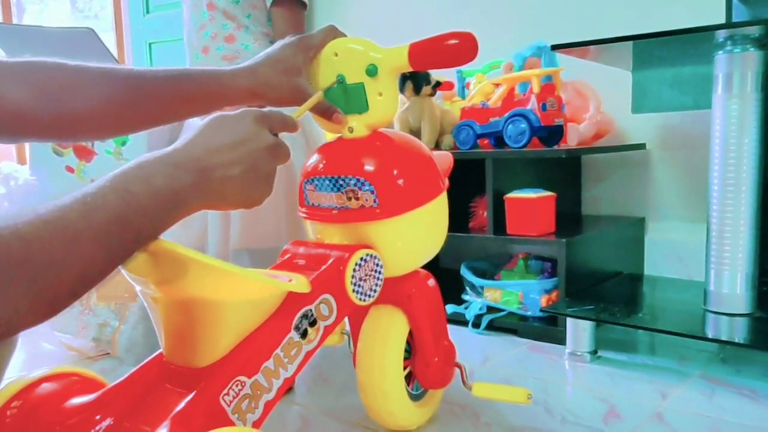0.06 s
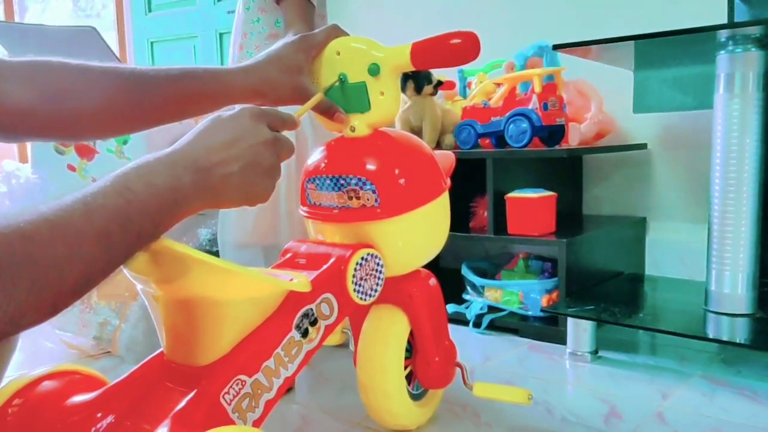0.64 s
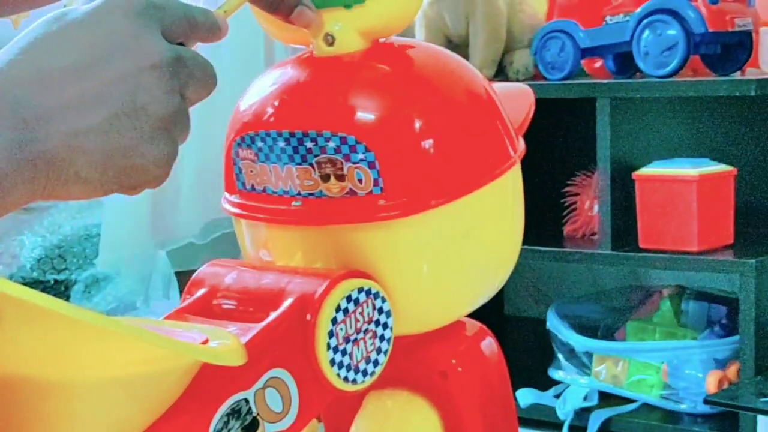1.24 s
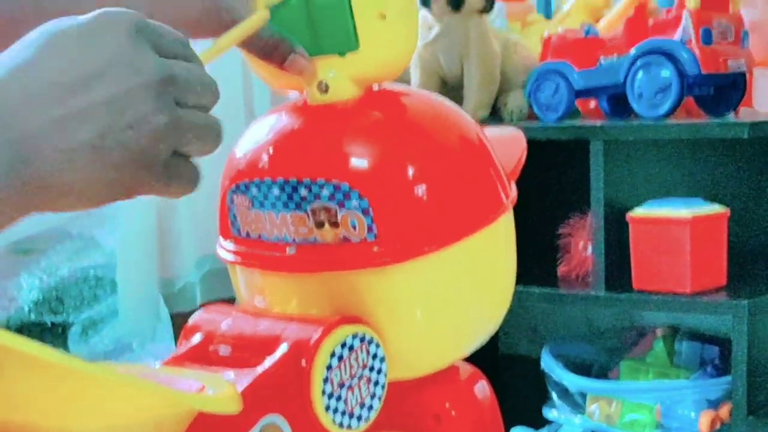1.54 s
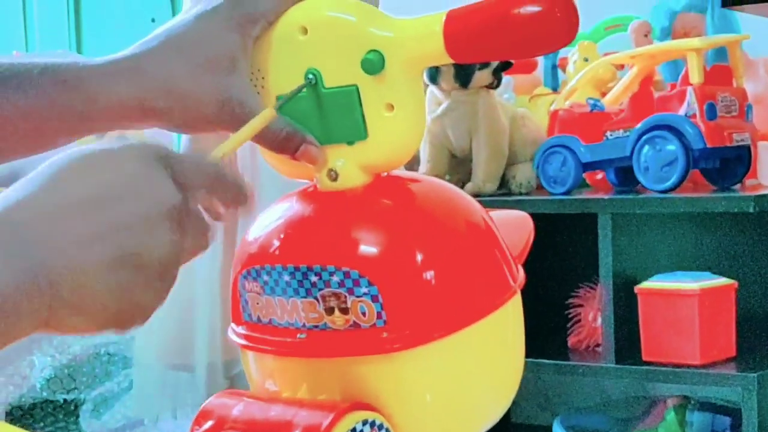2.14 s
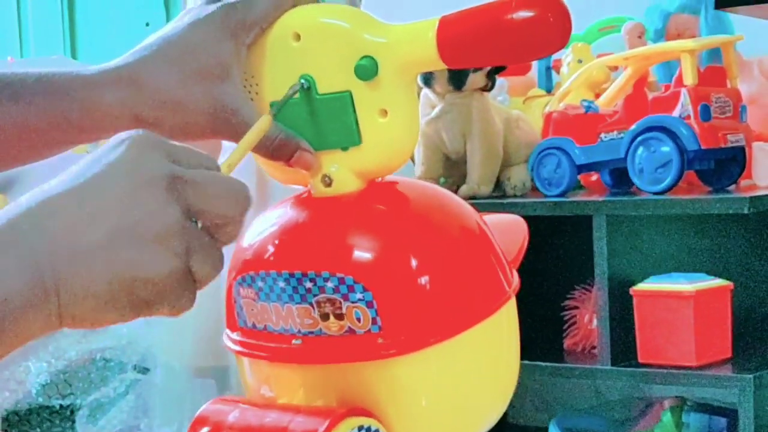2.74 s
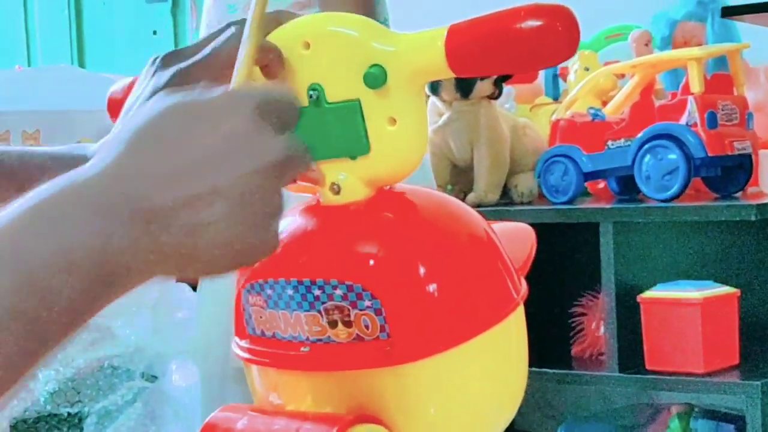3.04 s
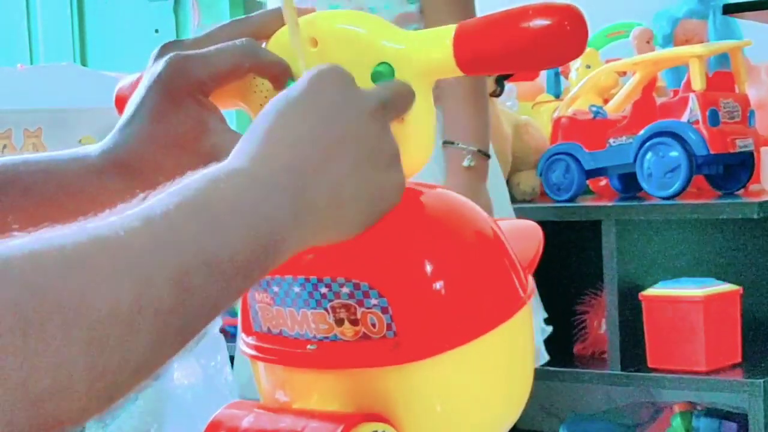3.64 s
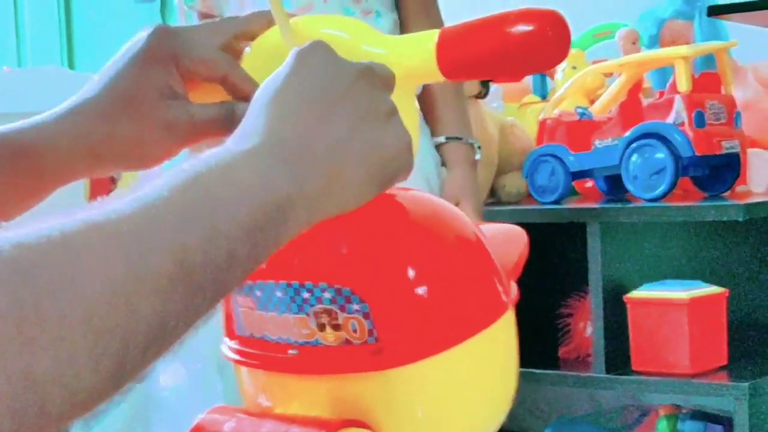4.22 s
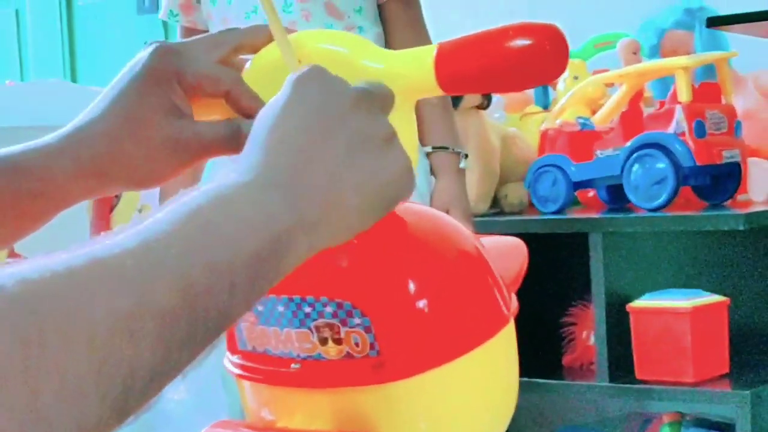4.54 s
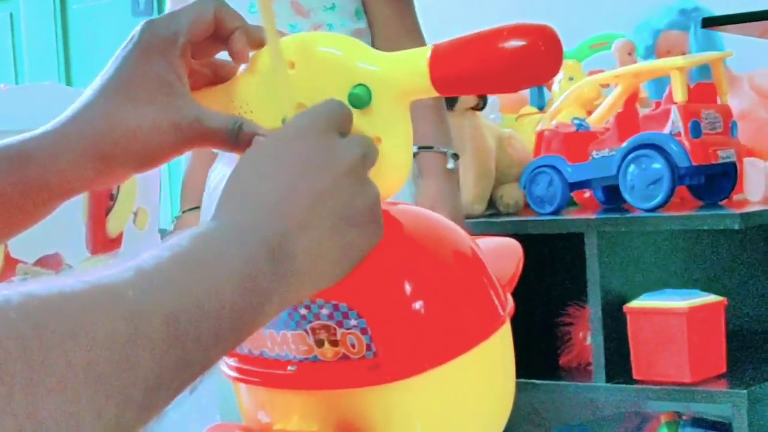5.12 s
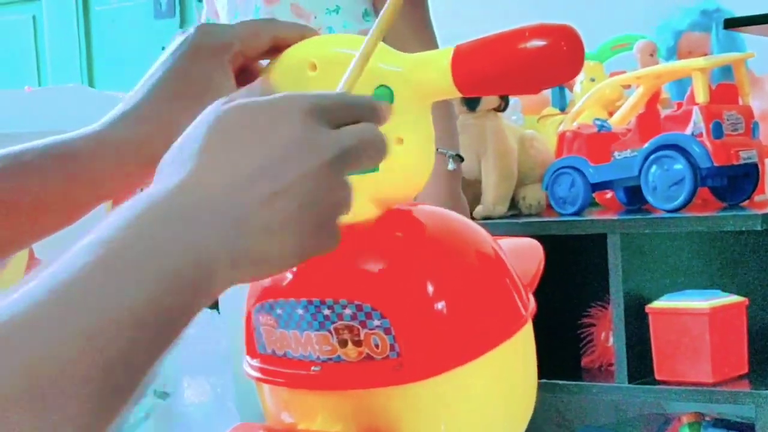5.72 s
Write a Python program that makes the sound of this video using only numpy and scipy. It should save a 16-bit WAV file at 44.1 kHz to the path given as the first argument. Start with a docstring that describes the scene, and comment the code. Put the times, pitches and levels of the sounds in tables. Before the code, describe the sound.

A screwdriver works on a hollow plastic toy tricycle, close to a hand-held phone in a small, hard-walled room. A quick cluster of sharp knocks opens. From 0.7 to 1.5 seconds come light ticks, short scrapes, soft skin sliding on plastic and tiny metal tinkles. Hollow, slightly booming knocks land around 1.9, 2.3, 2.7 and 2.9 seconds, with a little scraping between. Just after 3 seconds a dragging finger makes the shell hum briefly, followed by a tinkle. A hard knock among smaller clicks comes near 3.9 seconds, then scattered ticks. From 4.5 to 4.9 seconds fingers rub the phone, a dull rumble mostly on the right. Another hard double knock lands at 5.6 seconds, and a tick and short scrape follow near 5.9. Faint, distant falling whistles and high chirps come and go over quiet room air.

```python
"""Screwdriver on a toy tricycle.

The tip and the loose hollow plastic head knock and tick, ringing the shell. Between knocks the tip
skids in short scrapes and hands stroke the plastic, making its hollow hum. Faint wavering whistles,
high chirps and metal tinkles come and go. The room is small and hard-walled; the work is close to
a hand-held phone, on which fingers briefly shift."""
import sys
import numpy as np
from scipy import signal
from scipy.fft import rfft, irfft, next_fast_len
from scipy.io import wavfile
from scipy.ndimage import map_coordinates

SR = 44100
rng = np.random.default_rng(int(sys.argv[2]) if len(sys.argv) > 2 else 0)


def bounce(signal):
    """Save signal as a 16-bit WAV file at the path given by the first command-line argument."""
    frames = np.transpose(np.atleast_2d(signal))
    limited = np.clip(frames, -1, 1)
    pcm = np.round(limited * 32767).astype(np.int16)
    wavfile.write(sys.argv[1], SR, pcm)


N = 263277

# blows on the shell: start_s, level_db, cavity_db, edge_db, crack_db (last three relative to level_db)
KNOCKS = [(0.0665, -7, -8.5, -15, -10.5), (0.084, -12.5, 0, 10.5, 7.5), (0.1636, -9.5, -9, 1.5, -4),
          (0.737, -30, -47, 2.5, -6), (0.8012, -22, -25, -2, -11.5), (0.951, -22, -24, -1.5, -10),
          (0.966, -29.5, -23, 3.5, 8), (1.1584, -26.5, -33, 3, -4.5), (1.839, -16.5, -0.5, 1.5, 6.5),
          (1.858, -13, -11, -3.5, -28), (1.9529, -9.5, -11, -3.5, -7), (2.262, -11, -11, -3, -12.5),
          (2.6913, -10.5, -17, -10, -5.5), (2.898, -18.5, -12, -25, -40), (2.9065, -16, -11, -15, 0),
          (3.0575, -23.5, -11.5, -2, -0.5), (3.328, -22.5, -57, 6.5, -16),
          (3.6947, -18.5, -12.5, 9.5, -13.5), (3.8482, -18.5, -1, 10.5, 1.5), (3.861, -6, -9.5, 2.5, -8),
          (3.9174, -14, -28.5, 3, -12), (3.993, -29.5, -36, 2, -0.5), (4.0778, -17.5, -42, 2.5, -14.5),
          (4.3198, -30, -17, 13.5, -5.5), (4.4926, -26, -45, 0, -18), (4.6888, -24, -7.5, 10, -6),
          (4.8013, -17, -19, 8.5, -7), (5.5672, -5, -13.5, -1.5, -10.5), (5.6433, -14, -17, -9, -19),
          (5.878, -23, -35.5, -1, -10.5)]
# plastic shell modes: pitch_hz, level_db, t60_s
SHELL_MODES = [(355, -4.5, 0.0037), (483.4, -5, 0.095), (774, -11, 0.0033), (971.5, -8, 0.036),
               (1227, -3.5, 0.0079), (1316.5, -1, 0.012), (1495, -6, 0.017), (1980, -12, 0.012),
               (2220, -9.5, 0.01), (2587, -8, 0.0047), (4795, -10.5, 0.0028), (6836, -7, 0.0077),
               (8450, -16, 0.0025)]
# shell registers (cavity, wall, reference, edge low, edge high, crack): freq_hz
REGISTERS_HZ = [646, 893, 1520, 2100, 2300, 2955]
# low hollow booms of the shell, most just after a hard knock: start_s, pitch_hz, level_db
BOOMS = [(0.82, 256, -34), (1.516, 374, -38.5), (1.859, 310, -31), (1.957, 368.4, -19.5),
         (2.266, 312, -24.5), (2.695, 305, -21)]
# tip skids: start_s, length_s, level_db
SCRAPES = [(0.937, 0.041, -25), (1.053, 0.014, -29), (1.135, 0.046, -30), (1.326, 0.03, -34.5),
           (1.489, 0.035, -34), (2.085, 0.071, -28.5), (2.136, 0.098, -30), (2.978, 0.011, -29),
           (3.047, 0.02, -28.5), (3.09, 0.013, -23.5), (5.912, 0.077, -22)]
# hand strokes over the plastic: peak_s, width_s, level_db
STROKES = [(0.595, 0.11, -70.5), (0.964, 0.25, -57), (1.17, 0.16, -66.5), (1.415, 0.067, -60.5),
           (1.85, 0.55, -68.5), (3.07, 0.87, -65), (3.824, 0.25, -62.5), (5.933, 0.41, -70)]
# sliding skin spectrum: freq_hz, density_db
SKIN_SPECTRUM = [(1500, -67), (3200, -7), (3950, -16.5), (4900, -2.5), (6900, 1.5), (7800, 0), (8900, -4),
                 (9700, -8), (15500, -27)]
# finger drags on the head: start_s, length_s, level_db
GROANS = [(1.05, .055, -32.5), (1.39, .035, -36.5), (3.156, 0.13, -23.5)]
# small metal touches, as of a bracelet: start_s, level_db
TINKLES = [(1.184, -33.5), (1.281, -42), (1.385, -34), (1.407, -38), (2.421, -46.5), (3.278, -30.5)]
# tinkling metal modes: pitch_hz, level_db, t60_s
METAL_MODES = [(10070, 10, 0.021), (10330, 2, 0.072), (10580, 9.5, 0.018), (11300, -27, 0.021)]
# thin whistles: start_s, length_s, start_hz, end_hz, level_db
WHISTLES = [(0.391, 0.14, 2426, 2200, -57.5), (0.952, 0.17, 2300, 2200, -56.5),
            (1.393, 0.082, 3460, 3073, -66), (1.531, 0.21, 2660, 2186, -56.5),
            (1.59, 0.085, 3590, 3604, -64), (2.413, 0.098, 5950, 5980, -64), (2.454, 0.12, 3960, 2766, -63),
            (3.407, 0.19, 2713, 2047, -56), (3.984, 0.17, 2420, 2183, -53.5),
            (4.87, 0.23, 3266, 2960, -71.5), (4.914, 0.16, 2364, 2080, -61),
            (5.021, 0.27, 1642, 1569, -64.5), (5.394, 0.066, 2156, 2025, -68)]
# chirp runs: start_s, length_s, centre_hz, level_db
CHIRP_RUNS = [(1.705, 1.4, 3220, -69), (3.497, 1.3, 8210, -79), (4.877, 0.53, 8370, -73.5)]
# finger rubs on the phone: start_s, length_s, level_db
BUMPS = [(4.503, 0.085, -25), (4.588, 0.042, -16), (4.621, .24, -18.5)]
# room reverberation: freq_hz, level_db, t60_s
ROOM_BANDS = [(166, 1.5, 0.63), (306, 1.5, 0.21), (572, 4, 0.36), (1010, -0.5, 0.3), (2200, -1.5, 0.38),
              (4000, -1.5, 0.35), (13400, -1, 0.3)]
# still air spectrum: freq_hz, density_db
AIR_SPECTRUM = [(90, 4.5), (170, -4.5), (380, -10), (530, -3), (1400, -18.5), (7500, -27.5), (12000, -41.5)]
# right microphone relative to left: freq_hz, gain_db
RIGHT_MIC = [(300, 0), (1200, -4), (2200, -2.5), (4000, -6.5), (7500, -12), (14000, -9)]


def knocks(heavy_db=-9, swell_s=0.0052, chatter_s=0.0019, grit_s=0.0039, detune=0.04):
    """A brief faint noisy swell leads into each knock; the blow rings the shell and chatters to rest."""
    out = np.zeros(N)
    hz, db, t60_s = np.transpose(SHELL_MODES)
    lead = SR // 50
    t = (np.arange(4 * lead) - lead) / SR
    for start_s, level_db, cavity_db, edge_db, crack_db in KNOCKS:
        pitch_spread, uneven_db = rng.standard_normal((2, len(hz)))
        noise, grit = rng.standard_normal((2, len(t)))
        wall_db = max(level_db - heavy_db, 0)  # heavy blows flex the wall
        weight_db = register_db(hz, cavity_db, wall_db, edge_db, crack_db)
        shell = ring(hz * (1 + detune * pitch_spread), db + weight_db + uneven_db, t60_s)
        swell = noise ** 3 * np.exp(-abs(t) / swell_s) * (t < 0)
        chatter = noise ** 3 * np.exp(-abs(t) / chatter_s) * (t > 0)
        glance_db = 0.92 * max(heavy_db - level_db, 0)  # light blows glance off
        force = (t == 0) + at_energy(swell, glance_db - 22) + at_energy(chatter, glance_db - 9)
        add(out, start_s + t[0], excite(shell, force, level_db))
        grit = band(grit, 910, 12000 * 2 ** (crack_db / 20))  # softer contact, duller crack
        crack = grit * np.exp(-abs(t) / grit_s) * (t >= 0)
        add(out, start_s + t[0], at_energy(crack, level_db + crack_db - 7))
    # a small shell radiates no deep bass; plastic absorbs the top
    return band(band(out, 237, 13000), 235, 16100, order=3)


def register_db(hz, cavity_db, wall_db, edge_db, crack_db):
    """How strongly a contact drives each shell mode."""
    return np.interp(np.log(hz), np.log(REGISTERS_HZ), [cavity_db, wall_db, 0, edge_db, edge_db, crack_db])


def booms(t60_s=0.086, split=0.15):
    """The hollow shell booms, mostly just after a hard knock: a low mode and two weaker neighbours."""
    out = np.zeros(N)
    side = np.array([0, -1, 1])
    for start_s, hz, db in BOOMS:
        hollow = ring(hz * (1 + split * side), db - 6 * abs(side), np.full(3, t60_s), size=8192)
        add(out, start_s, band(hollow, hz / 2, hz * 2))
    return out


def scraping(hollow_hz=555, hollow_t60_s=0.11, creep_db=-10):
    """The tip skids, and creeps with the hand; its coarse slips ring shell and hollow."""
    hz, db, t60_s = np.transpose(SHELL_MODES)
    shell = ring(hz, db + register_db(hz, cavity_db=-10, wall_db=0, edge_db=-2, crack_db=-14), t60_s)
    hollow = ring(np.array([hollow_hz]), -5, np.array([hollow_t60_s]))
    body = band(shell + band(hollow, 300, 930), 384, 3150)
    creep = unit_rms(slips(rate_hz=600, spread_db=1.5) * undb(5 * wander(rate_hz=28)))
    force = skids() + undb(creep_db) * hand_speed() * creep
    return signal.fftconvolve(force, at_energy(body, 0))[:N]


def skids(rate_hz=500, catch_db=-6, fade_db=-7):
    """Tip force: one catch as it breaks free, then weakening slips."""
    out = np.zeros(N)
    for start_s, length_s, db in SCRAPES:
        progress = np.linspace(0, 1, int(length_s * SR))
        slipping = rng.random(SR)[:len(progress)] < rate_hz / SR
        strength = rng.standard_normal(SR)[:len(progress)]
        force = slipping * strength * undb(fade_db * progress)
        force[0] = undb(catch_db) * np.sqrt(rate_hz * length_s)
        add(out, start_s, at_energy(force, db))
    return out


def stroking():
    """Skin slides on plastic in fine slips; their colour shifts with the grip."""
    edges_hz = np.geomspace(1500, 16000, 17)
    hiss = np.zeros(N)
    for lo_hz, hi_hz in zip(edges_hz, edges_hz[1:]):
        friction = band(slips(rate_hz=5700, spread_db=7), lo_hz, hi_hz, order=3)
        hiss += friction * undb(3 * wander(rate_hz=13))
    return hand_speed() * unit_rms(colour(hiss, SKIN_SPECTRUM))


def hand_speed(rest_db=-81, taper=2.7):
    """Speed as a gain: one bell per stroke, over a grip that is never quite still."""
    t = np.arange(N) / SR
    power = sum(undb(db) ** 2 * .5 ** (abs(2 * (t - peak_s) / width_s) ** taper)
                for peak_s, width_s, db in STROKES)
    return np.sqrt(undb(rest_db) ** 2 + power)


def slips(rate_hz, spread_db):
    """Stick-slip: tiny random clicks, a few much stronger."""
    clicks = (rng.random(N) < rate_hz / SR) * rng.standard_normal(N)
    return clicks * undb(spread_db * np.minimum(rng.exponential(size=N), 4))


def groans():
    """Fingers drag on the head; its hollow hums."""
    return judders(GROANS, lo_hz=465, hi_hz=580)


def judders(rubs, lo_hz, hi_hz):
    """A fingertip sticks and slips, pressing then easing; the surface answers in one narrow band."""
    out = np.zeros(N)
    for start_s, length_s, db in rubs:
        progress = np.clip(np.arange(SR // 2) / SR / length_s, 0, 1)
        friction = rng.standard_normal(len(progress)) * np.sqrt(progress * (1 - progress))
        add(out, start_s, at_energy(band(friction, lo_hz, hi_hz, order=3), db))
    return out


def tinkles(detune=0.017, jostle_s=0.0068, jostle_db=-2):
    """Tiny metal parts touch, jostle and ring very high."""
    out = np.zeros(N)
    hz, db, t60_s = np.transpose(METAL_MODES)
    t = np.arange(SR // 10) / SR
    for start_s, level_db in TINKLES:
        metal = ring(hz * (1 + detune * rng.standard_normal(len(hz))), db + level_db, t60_s)
        jostle = rng.standard_normal(len(t)) ** 3 * np.exp(-t / jostle_s)
        force = (t == 0) + at_energy(jostle, jostle_db)
        add(out, start_s, excite(metal, force, 0))
    return band(out, 8500, 13500)


def bumps(left_db=-14):
    """Fingers rub on the phone: dull rumble and a thump, mostly on the right."""
    return judders(BUMPS, lo_hz=55, hi_hz=130) * undb([[left_db], [0]])


def whistles():
    """Faint single whistles, most of them falling."""
    out = np.zeros(N)
    for start_s, length_s, start_hz, end_hz, db in WHISTLES:
        add(out, start_s, undb(db) * airy_tone(length_s, start_hz, end_hz))
    return out


def chirps(chirp_s=0.1, scatter=0.12, fall=0.03):
    """Runs of short overlapping chirps at scattered pitches."""
    out = np.zeros(N)
    for start_s, length_s, centre_hz, db in CHIRP_RUNS:
        for onset_s in np.arange(start_s, start_s + length_s - chirp_s, chirp_s / 2):
            late, pitch, strength = rng.standard_normal(3)
            top_hz = centre_hz * (1 + scatter * np.tanh(pitch))
            chirp = airy_tone(chirp_s, top_hz, top_hz * (1 - fall))
            add(out, onset_s + late * chirp_s / 10, undb(db + 2 * strength) * chirp)
    return out


def airy_tone(length_s, start_hz, end_hz, steady=1.5, waver=0.01434, waver_hz=70, flutter_db=5):
    """A thin tone with a noise fringe swells and glides, fast at first; it wavers and breaks up."""
    progress = np.linspace(0, 1, int(length_s * SR))
    wobble, flutter = (np.interp(progress * length_s * waver_hz, np.arange(64), knots)
                       for knots in rng.standard_normal((2, 64)))
    glide_hz = end_hz + (start_hz - end_hz) * (1 - progress) ** 1.5
    depth = waver * np.sqrt(abs(start_hz / end_hz - 1) * 10)
    phase = 2 * np.pi * np.cumsum(glide_hz * (1 + depth * wobble)) / SR
    lowpass = signal.butter(2, np.sqrt(end_hz) * 1.7, fs=SR, output="sos")
    fringe = unit_rms(signal.sosfilt(lowpass, rng.standard_normal((2, SR // 2))))[:, :len(progress)]
    tone = (steady + fringe[0]) * np.sin(phase) + fringe[1] * np.cos(phase)
    swell = np.sqrt(progress * (1 - progress))
    return unit_rms(tone * swell * undb(flutter_db * flutter))


def shelf(x, level_db=-9):
    """Toys on a nearby shelf scatter the upper range within 5 ms, differently to each microphone."""
    scatter = band(rng.standard_normal((2, SR // 200)), 800, 15000)
    return signal.fftconvolve(x[None], at_energy(scatter, level_db), axes=1)[:, :N]


def moving_room(x, positions=5):
    """The phone drifts in the hand; one reflection pattern fades into the next."""
    place = np.linspace(0, positions - 1, N)
    return sum(room(x * np.sqrt(np.clip(1 - abs(place - k), 0, 1))) for k in range(positions))


def room(x, build_s=0.01, gap_s=0.00033, alike_hz=650, size=32768):
    """Wall reflections build, then decay; the bass is alike in both microphones."""
    t = np.arange(size) / SR
    bins_hz = np.fft.rfftfreq(size, 1 / SR)
    mid, side = rfft(rng.standard_normal((2, size)))
    alike = 1 / (1 + (bins_hz / alike_hz) ** 2)
    pair = (mid * np.sqrt(1 + alike) + np.array([[1], [-1]]) * side * np.sqrt(1 - alike)) / np.sqrt(2)
    build = np.clip((t - gap_s) / build_s, 0, 1)
    edges_hz = 90 * 2 ** (np.arange(16) / 2)
    response = np.zeros((2, size))
    for lo_hz, hi_hz in zip(edges_hz, edges_hz[1:]):
        hz = np.sqrt(lo_hz * hi_hz)
        decay = np.exp(-np.log(1000) * t / at_hz(hz, ROOM_BANDS, column=2))
        reflections = irfft(pair * ((bins_hz >= lo_hz) & (bins_hz < hi_hz)))
        response += at_energy(build * decay, at_hz(hz, ROOM_BANDS)) * reflections
    return signal.fftconvolve(x[None], response, axes=1)[:, :N]


def room_air(level_db=-74.5):
    """Still air: dark noise whose level wanders by about 1 dB."""
    gain = undb(level_db + wander(rate_hz=3))
    return gain * unit_rms(colour(rng.standard_normal((2, N)), AIR_SPECTRUM))


def ring(hz, db, t60_s, size=4096):
    """Decaying modes of alternating sign; their energies add."""
    t = np.arange(size) / SR
    decay = np.log(1000) / t60_s
    gain = undb(db) * np.sqrt(decay) * (-1) ** np.arange(len(hz))
    modes = np.exp(-decay[:, None] * t) * np.sin(2 * np.pi * hz[:, None] * t)
    return at_energy(gain @ modes, 0) * np.linalg.norm(undb(db))


def excite(body, force, db):
    """Drive a body; db is relative to the energy of its impulse response."""
    return at_energy(signal.fftconvolve(force, body), db) * np.linalg.norm(body)


def undb(db):
    """Decibels to gain."""
    return 10 ** (np.asarray(db) / 20)


def unit_rms(x):
    """Scale to rms 1."""
    return x / np.sqrt(np.mean(x ** 2))


def at_energy(x, db):
    """Scale to a total energy."""
    return undb(db) * x / np.linalg.norm(x)


def at_hz(hz, points, column=1):
    """Interpolate a table column over log frequency."""
    table = np.array(points, float)
    return np.interp(np.log(np.maximum(hz, 1)), np.log(table[:, 0]), table[:, column])


def colour(x, points):
    """Filter by a (freq_hz, gain_db) curve."""
    size = next_fast_len(x.shape[-1])
    gain = undb(at_hz(np.fft.rfftfreq(size, 1 / SR), points))
    return irfft(rfft(x, size) * gain, size)[..., :x.shape[-1]]


def band(x, lo_hz, hi_hz, order=2):
    """Causal band-pass."""
    sos = signal.butter(order, [lo_hz, min(hi_hz, .49 * SR)], "band", fs=SR, output="sos")
    return signal.sosfilt(sos, x)


def wander(rate_hz):
    """Random drift, spread near 1."""
    knots = rng.standard_normal(2000)
    return np.interp(np.arange(N) / SR * rate_hz, np.arange(len(knots)), knots)


def add(track, start_s, sound):
    """Mix a sound into a track."""
    start = int(start_s * SR)
    lo, hi = max(start, 0), min(start + len(sound), N)
    track[lo:hi] += sound[lo - start:hi - start]


def scene(far_direct_db=-9, turn_s=(2.8, 3.2), turn_room_db=0.5):
    """Toy and far whistles, direct and reflected, over room air and handling; stereo."""
    toy = knocks() + booms() + groans() + scraping() + stroking() + tinkles()
    far = whistles() + chirps()
    direct = toy + undb(far_direct_db) * far
    # left lags until the phone turns to face the toy
    facing = np.interp(np.arange(N) / SR, turn_s, [0, 1])
    lag_samples = 2 * (1 - facing)
    direct_left = map_coordinates(direct, [np.arange(N) - lag_samples])
    early = np.array([direct_left, direct]) + shelf(toy)
    reverb = moving_room(toy * undb(turn_room_db * facing) + far)
    left, right = early + reverb + room_air()
    return np.array([left, colour(right, RIGHT_MIC)]) + bumps()


def record(dry):
    """The phone cuts the top."""
    top_hz = 15600
    return signal.sosfilt(signal.ellip(8, .2, 70, top_hz, fs=SR, output="sos"), dry)


dry = scene()
out = record(dry)
bounce(out)
```